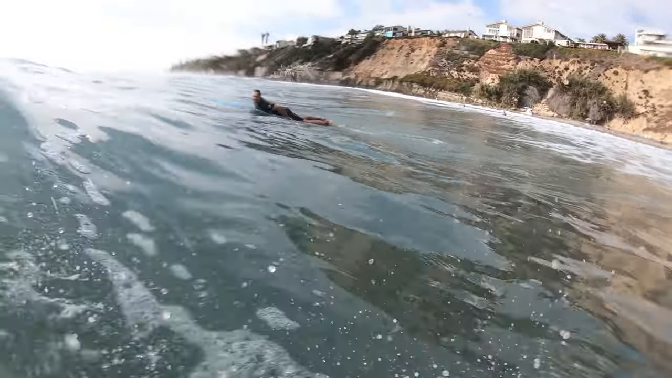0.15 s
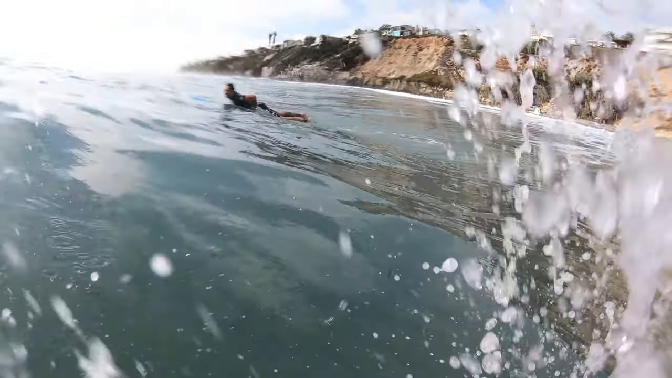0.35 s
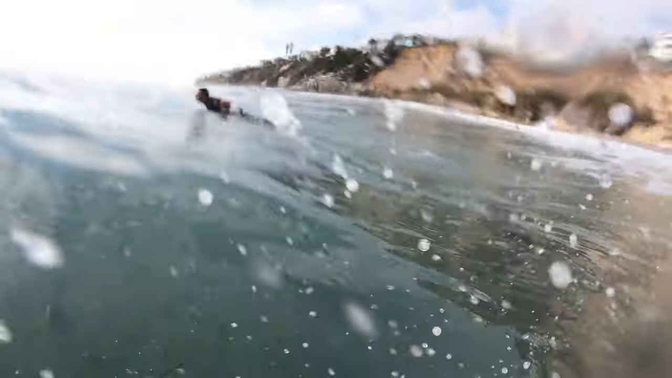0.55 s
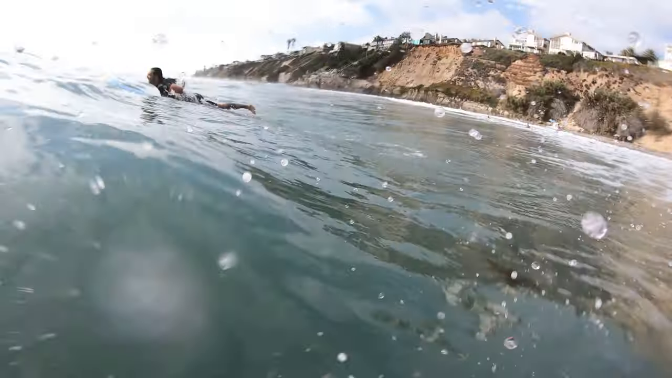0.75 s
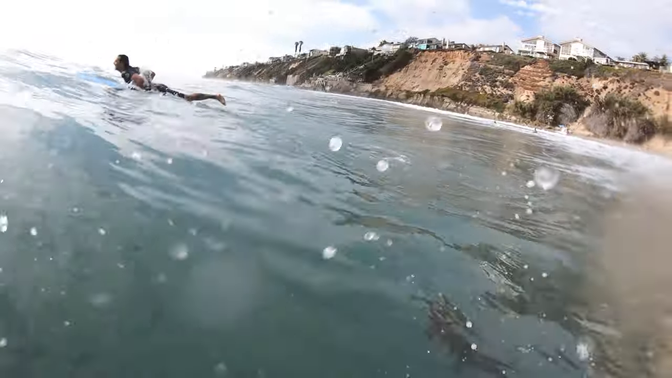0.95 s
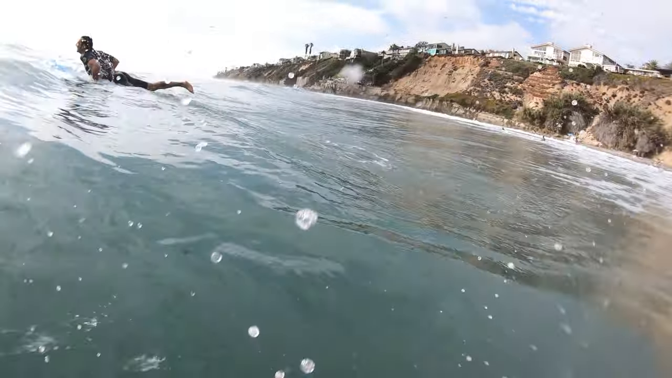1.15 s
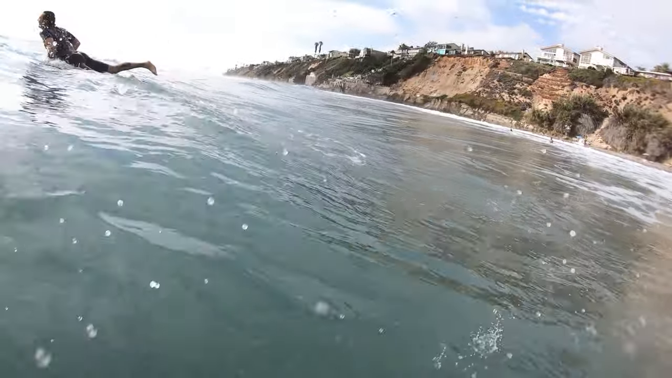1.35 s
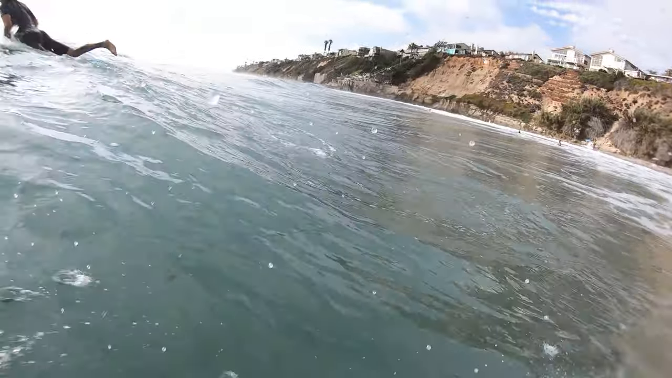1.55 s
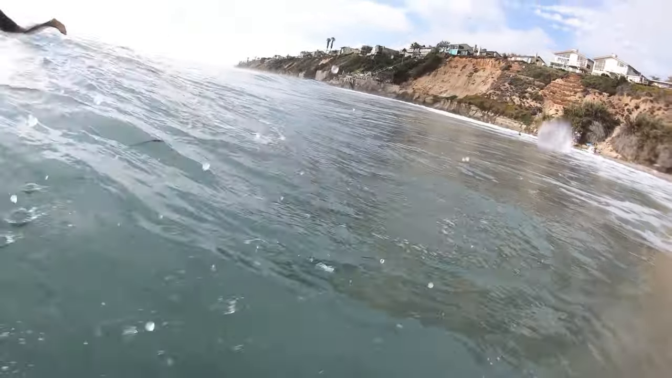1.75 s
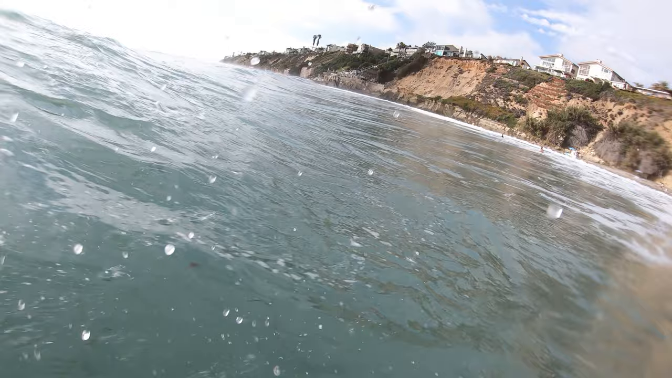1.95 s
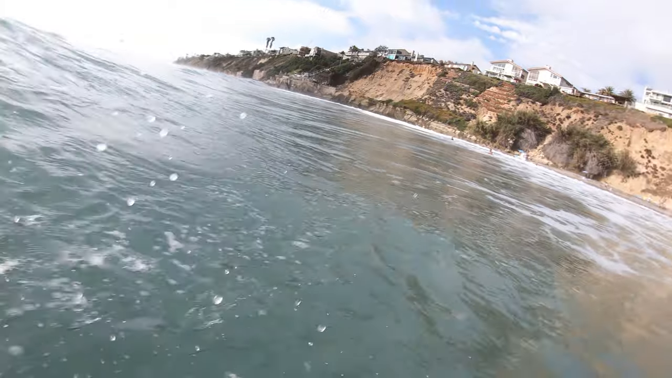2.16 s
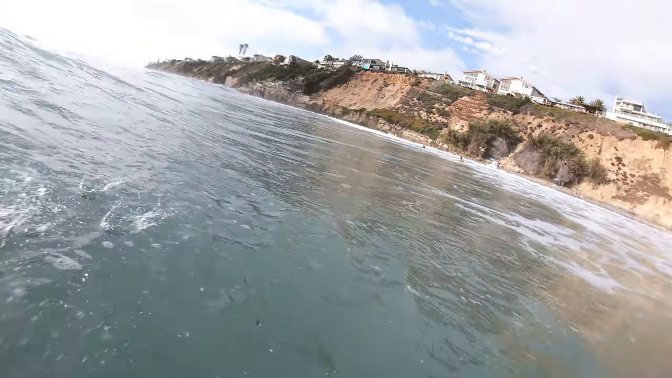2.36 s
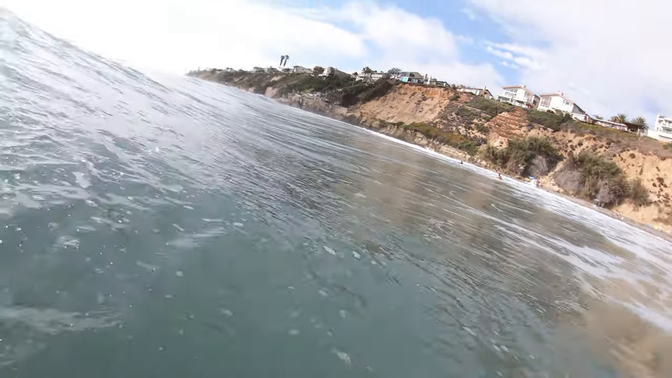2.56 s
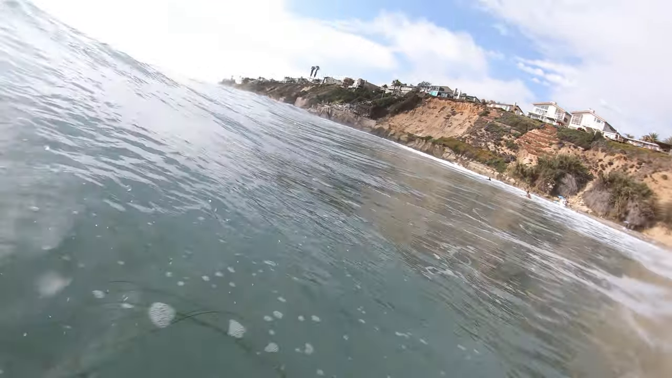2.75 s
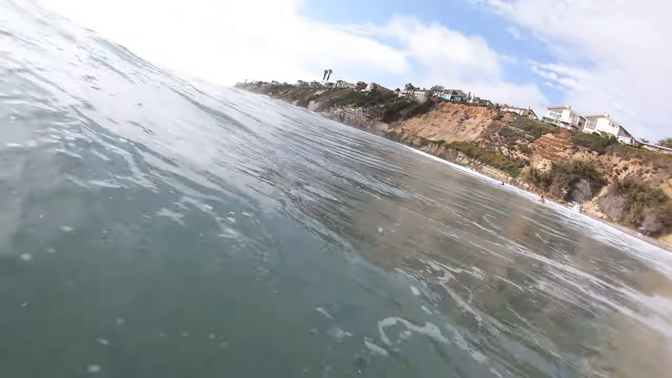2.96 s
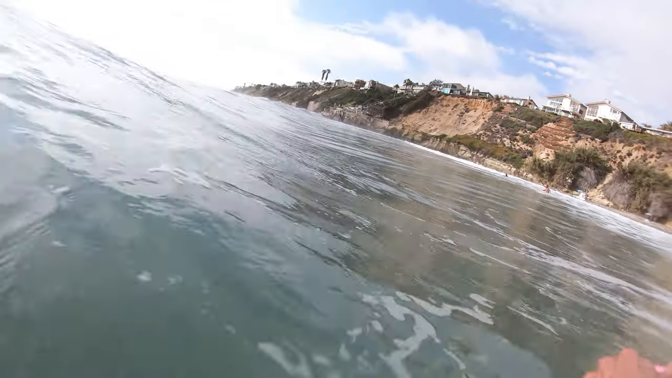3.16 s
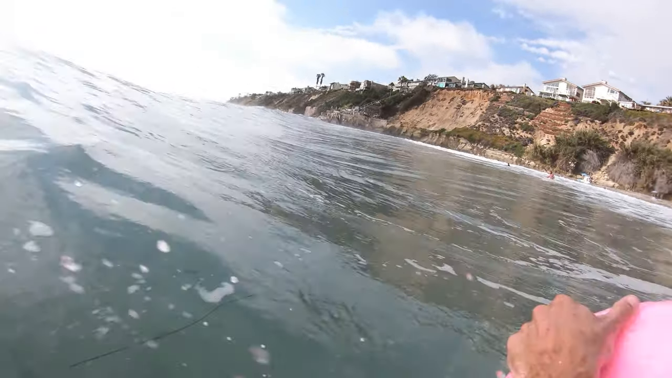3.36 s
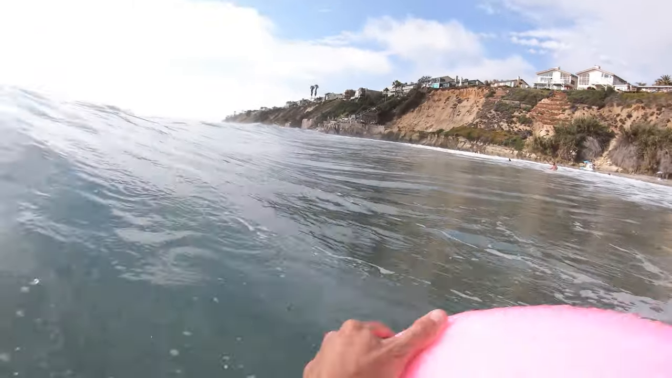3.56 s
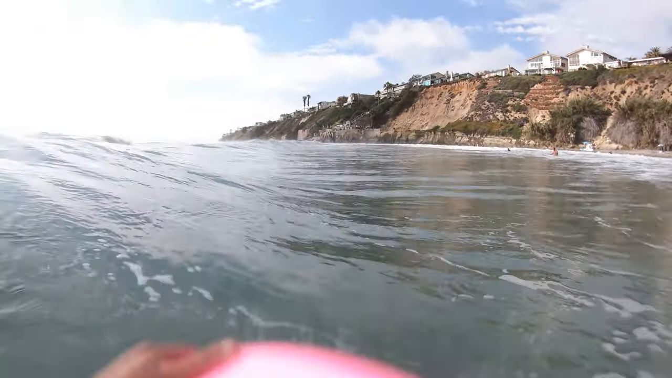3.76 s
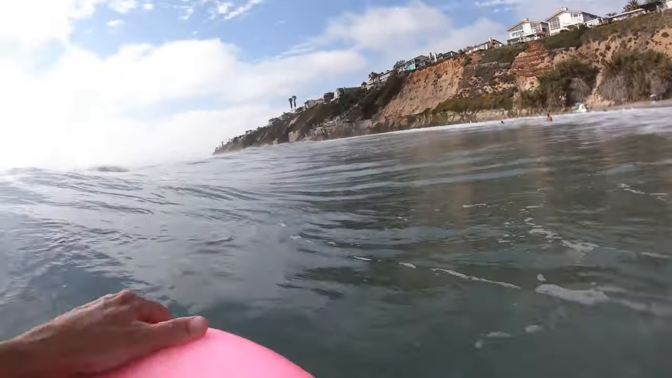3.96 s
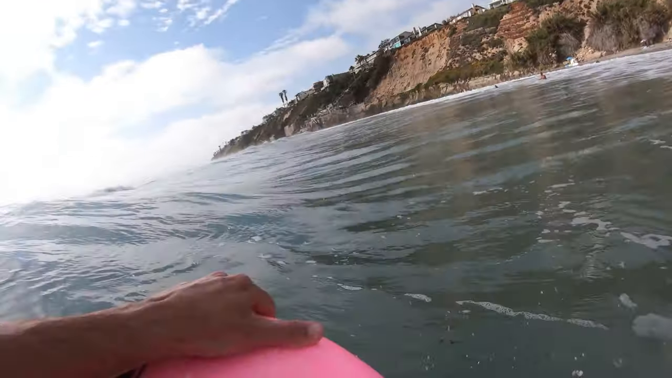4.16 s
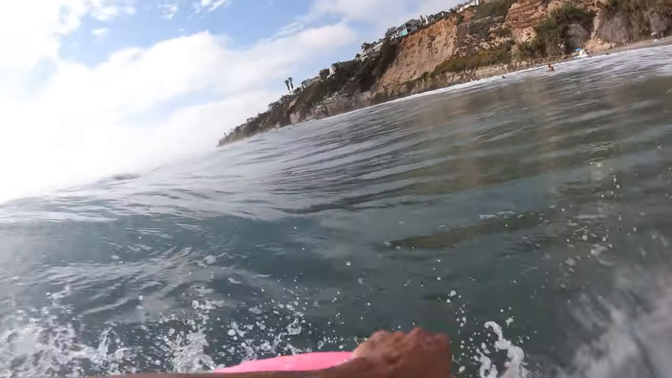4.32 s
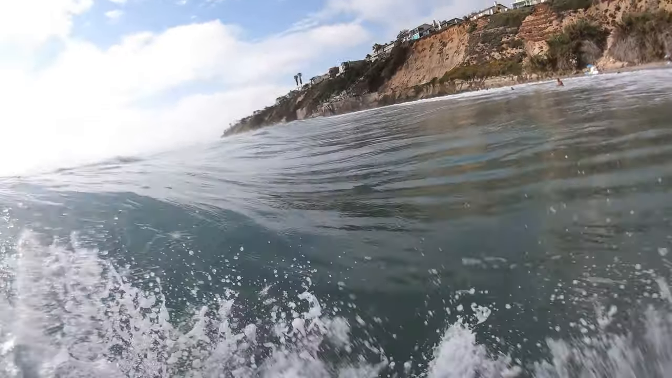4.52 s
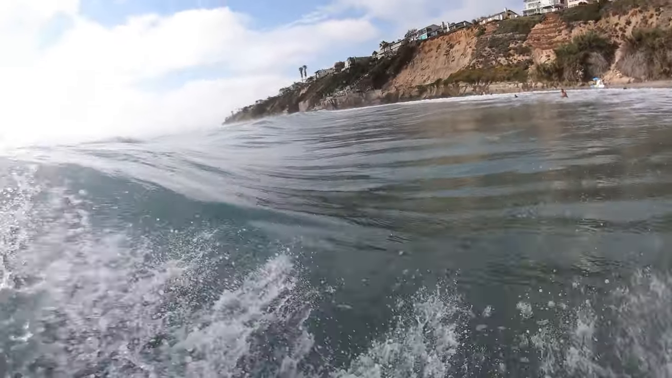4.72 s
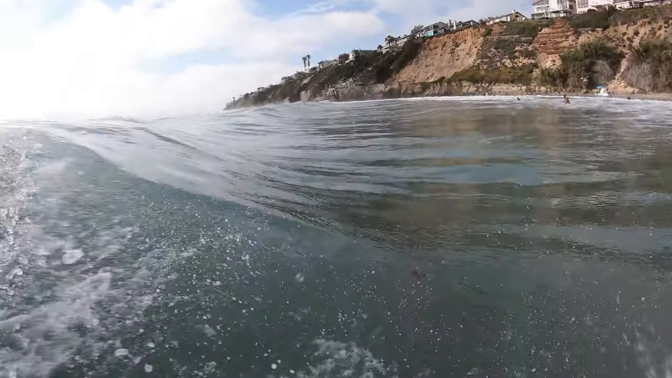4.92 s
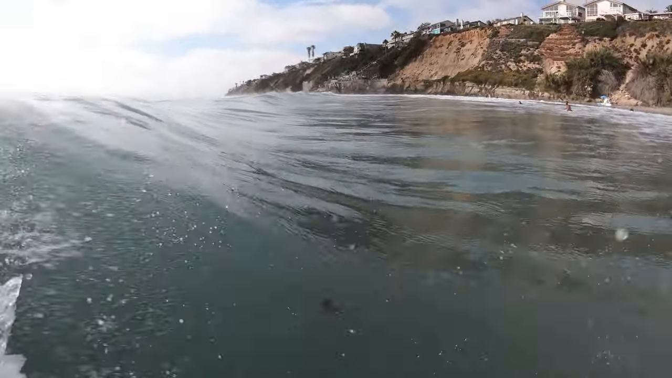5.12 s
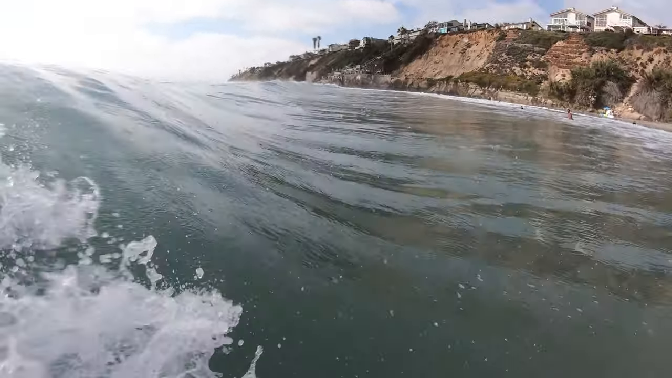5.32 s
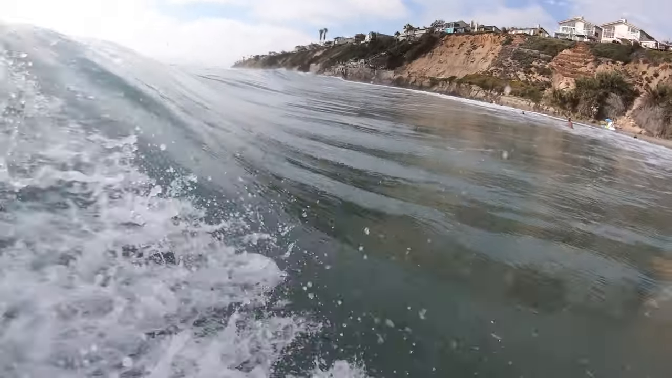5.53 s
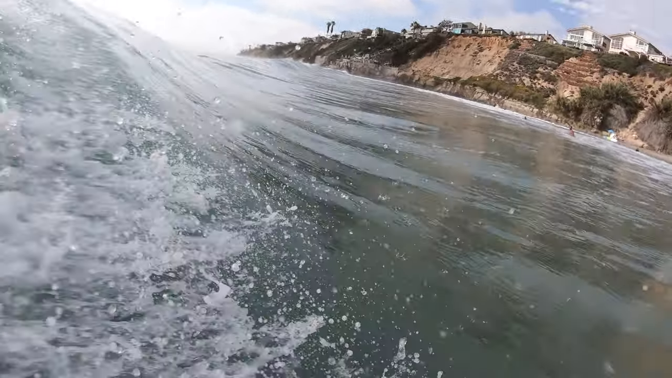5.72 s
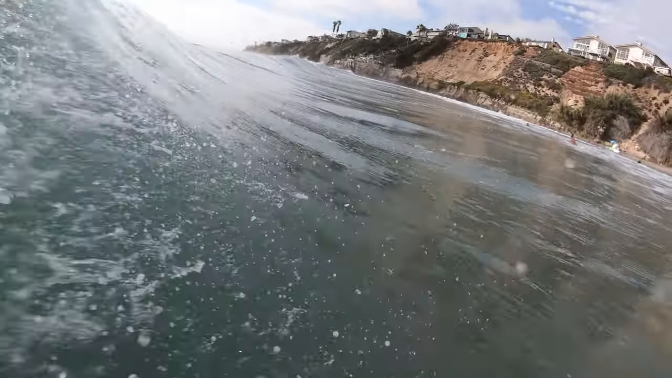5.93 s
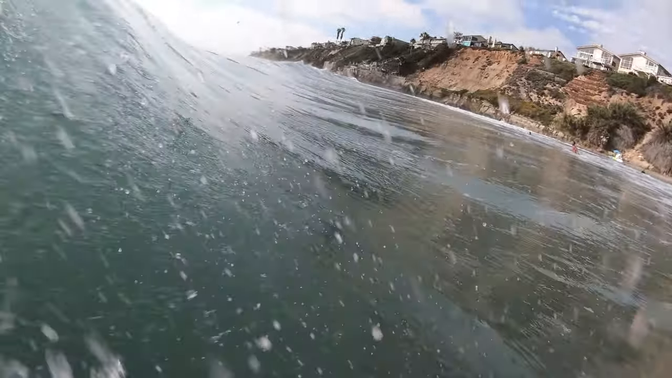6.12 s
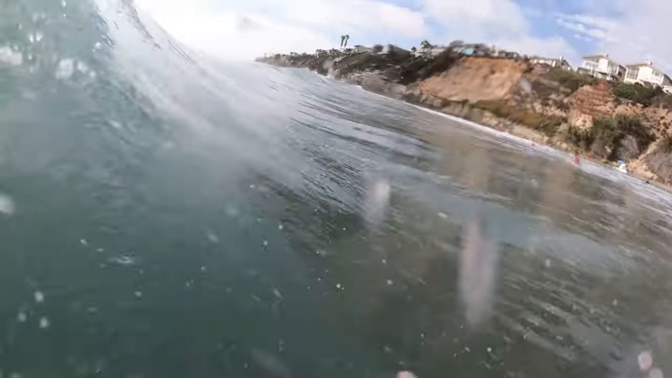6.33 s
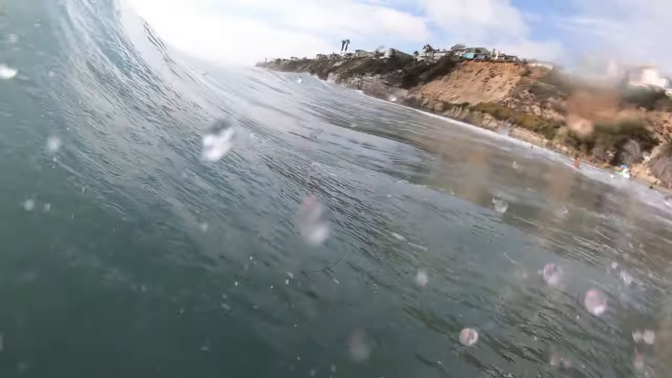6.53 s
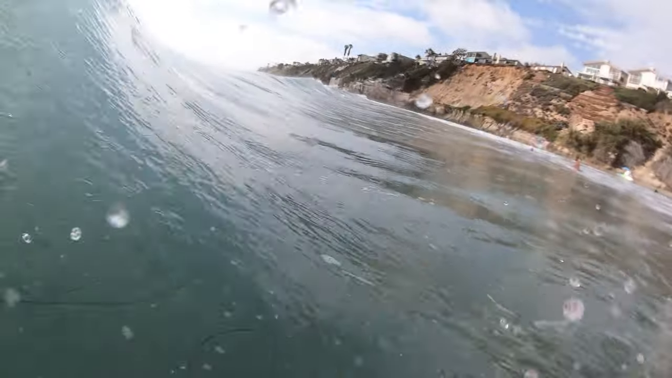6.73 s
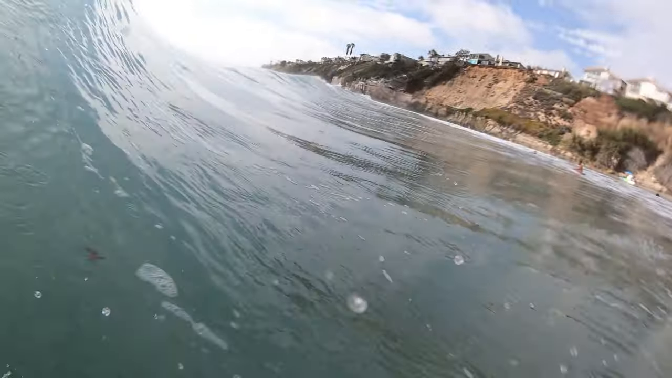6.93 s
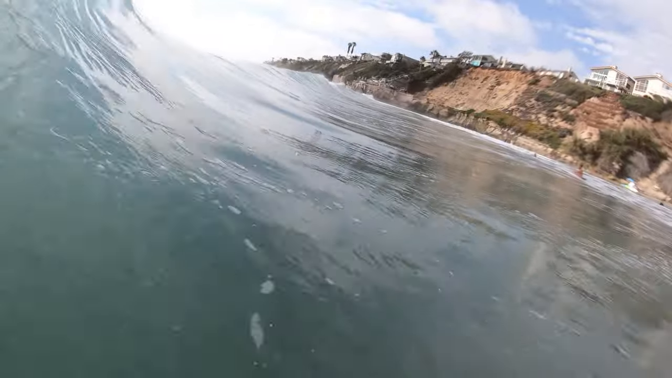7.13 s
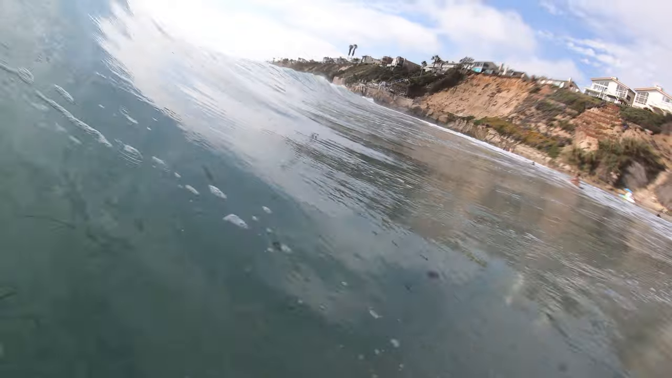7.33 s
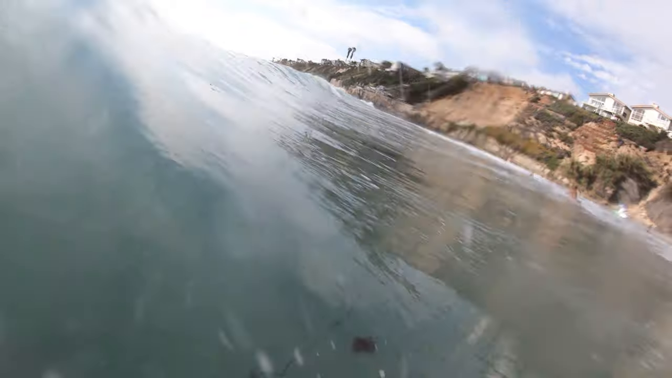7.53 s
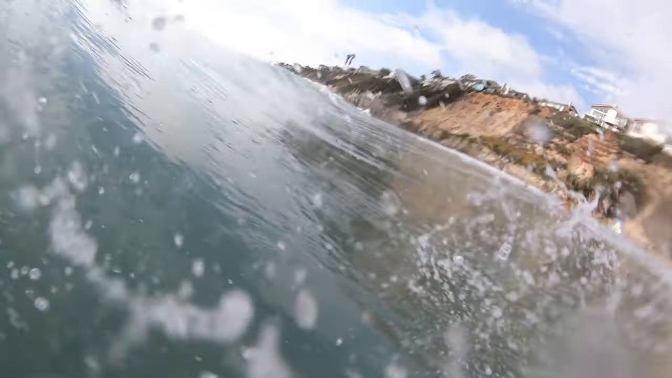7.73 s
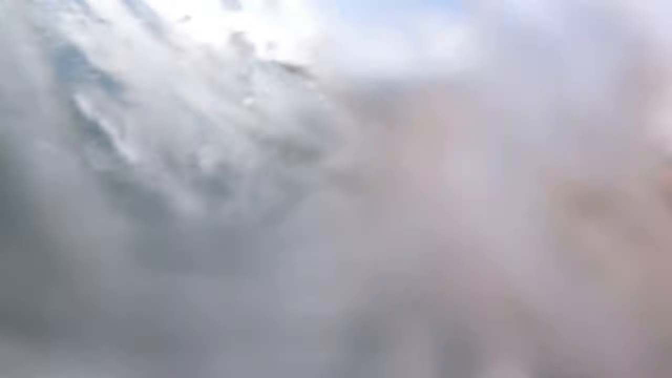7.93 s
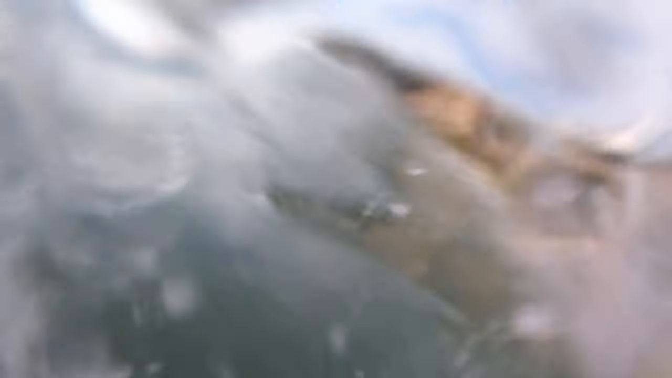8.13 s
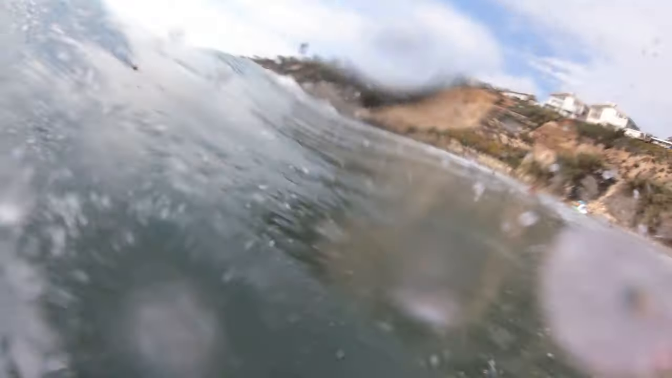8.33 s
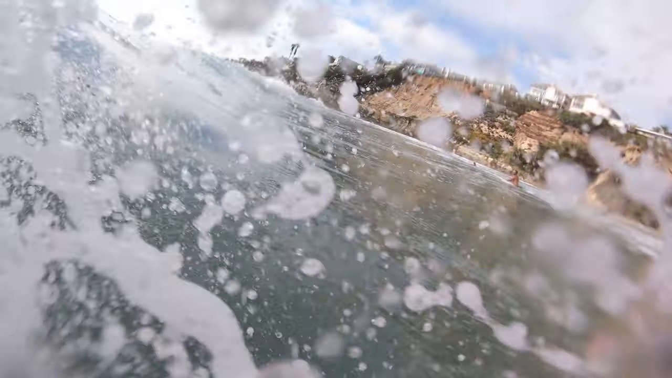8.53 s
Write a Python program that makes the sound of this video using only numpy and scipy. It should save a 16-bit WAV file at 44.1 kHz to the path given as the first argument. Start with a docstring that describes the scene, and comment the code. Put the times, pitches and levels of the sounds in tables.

```python
"""A small waterproof camera rides along a breaking wave, just above the water.
From the start wind buffets its wet microphone port and water rushes past the board, in bubbles and air pockets.
Half a second in, drops tick on the housing and a film drains off it as a band of fizz with a sinking edge.
From 3 s foam froths up, ripples plop and water slaps the port; after 6 s a big shower patters and runs off.
At 8 s the whitewater crashes over with a falling gurgle, thuds and smacks, and seals the port."""
import sys
import numpy as np
from scipy import signal
from scipy.fft import rfft, irfft, next_fast_len
from scipy.io import wavfile
from scipy.ndimage import uniform_filter1d

SR = 44100
rng = np.random.default_rng(int(sys.argv[2]) if len(sys.argv) > 2 else 0)


def materialize(psi):
    """Save the field psi as 16-bit PCM at rate SR to the path in sys.argv[1].

    A 1-D psi becomes a single channel; in a 2-D psi each row is a channel.
    """
    bounded = np.clip(np.atleast_2d(psi).T, -1, 1)
    quanta = np.round(bounded * 32767).astype(np.int16)
    wavfile.write(sys.argv[1], SR, quanta)


N = 382768
TIME = np.arange(N) / SR


def from_db(db):
    """Decibels to gain."""
    return 10 ** (np.asarray(db) / 20)


def rms_one(x):
    """Scale to unit rms."""
    return x / np.sqrt(np.mean(x ** 2) + 1e-20)


def in_time(rows):
    """Draw each column of a table as a curve, sample by sample."""
    s, *columns = np.transpose(rows)
    return [np.interp(TIME, s, column) for column in columns]


def add(out, s, sound):
    """Mix a short sound in at a time."""
    i = int(s * SR)
    out[i:i + len(sound)] += sound[:N - i]


def low_pass(x, hz, order=2):
    """Butterworth low-pass."""
    return signal.sosfilt(signal.butter(order, hz, fs=SR, output="sos"), x)


def band_pass(x, hz, spread, order=2):
    """Butterworth band-pass from hz / (1 + spread) to hz * (1 + spread)."""
    edges = [hz / (1 + spread), hz * (1 + spread)]
    return signal.sosfilt(signal.butter(order, edges, "band", fs=SR, output="sos"), x)


def drift(rate):
    """Slow random wander of unit rms; its movement thins out above rate [Hz]."""
    step = 40   # samples between the points that are drawn
    settle = 2000   # points dropped while the filter settles
    r = np.exp(-2 * np.pi * rate * step / SR)
    chance = rng.standard_normal(N // step + 2 + settle)
    slow = signal.lfilter([1], [1, -2 * r, r * r], chance)[settle:]
    return np.interp(np.arange(N) / step, np.arange(len(slow)), rms_one(slow))


def coloured(x, colour):
    """Filter an excitation with a spectral curve, silent outside its ends; rms 1."""
    size = next_fast_len(N + SR // 10)
    log_hz = np.log(np.maximum(np.arange(size // 2 + 1) * SR / size, 1))
    hz, db = np.transpose(colour)
    gain = from_db(np.interp(log_hz, np.log(hz), db, left=-np.inf, right=-np.inf))
    return rms_one(irfft(rfft(x, size) * gain, size)[:N])


def eddies(lumpy_db, rate):
    """Turbulent pressure: noise that swells and sinks with each passing eddy."""
    return rng.standard_normal(N) * from_db(lumpy_db * drift(rate))


def grains(per_s, size_db):
    """Random impacts, many small and a few large."""
    sizes = from_db(size_db * np.minimum(rng.exponential(1, N), 4))
    signs = rng.choice([-1, 1], N)
    return sizes * signs * (rng.random(N) < per_s / SR)


def bubbles(per_s, size_db, cycles, low_hz, high_hz, count=20):
    """Bubbles of many sizes, each a resonance that falls 60 dB in some cycles."""
    born = grains(per_s, size_db)
    dealt = rng.integers(0, count, N)   # which size each bubble has
    out = 0
    for k, hz in enumerate(np.geomspace(low_hz, high_hz, count)):
        r = np.exp(-np.log(1000) * hz / (cycles * SR))
        w = 2 * np.pi * hz / SR
        births = born * (dealt == k) + 1e-18
        ringing = signal.lfilter([1, 0, -1], [1, -2 * r * np.cos(w), r * r], births)
        out = out + np.sqrt(hz) * ringing
    return rms_one(out)


def plop(hz, cycles):
    """A sine whose envelope swells for some cycles to height 1 and dies away."""
    phase = TIME[:SR // 20] * hz
    age = phase / cycles
    return (age * np.exp(1 - age)) ** 2 * np.sin(2 * np.pi * phase)


# changing air stream on the port: (time [s], rumble [dB], buffet [dB])
AIR_STREAM = [(0, -32, -26.5), (.85, -27, -22.5), (1.1, -29, -28.5), (1.62, -26, -25.5),
              (1.8, -30.5, -30.5), (2.35, -32.5, -29.5), (2.47, -25, -23), (3.05, -35, -26),
              (3.7, -34, -28.5), (4.35, -35, -23), (4.7, -41, -28.5), (4.98, -29.5, -26), (5.3, -35, -28.5),
              (5.7, -33.5, -32), (5.92, -31.5, -27), (6.3, -36, -26.5), (6.9, -28, -24.5),
              (7.55, -32.5, -27.5), (7.8, -26, -25.5), (8.0, -31.5, -33.5), (8.68, -35.5, -28.5)]
# gusts and surges of whitewater on the port: (middle [s], half-length [s], rumble [dB], buffet [dB])
GUST_SWELLS = [(0.703, 0.097, -26.5, -35), (4.265, 0.041, -32, -23), (5.045, 0.062, -26, -19.5),
               (6.422, 0.055, -23.5, -21), (6.631, 0.05, -50, -19.5), (7.872, 0.028, -25, -14),
               (8.088, 0.058, -22, -20), (8.183, 0.022, -12, -15.5), (8.64, 0.026, -15, -20.5)]
# spectra of the large and the smaller eddies: (frequency [Hz], relative density [dB])
RUMBLE_SPECTRUM = [(10, -12.5), (26, 0), (42, 1.5), (60, -6.5), (90, -18), (250, -50.5)]
BUFFET_SPECTRUM = [(35, -27), (62, 0.5), (90, 0.5), (130, -0.5), (200, -10.5), (300, -15), (600, -46),
                   (1500, -94.5)]


def wind():
    """Large eddies rumble on the port, smaller ones buffet it; gusts swell out of the changing stream."""
    rumble, buffet = from_db(in_time(AIR_STREAM))
    for s, half, rumble_db, buffet_db in GUST_SWELLS:
        swell = np.exp(-((TIME - s) / half) ** 2 / 2)
        rumble = np.hypot(rumble, from_db(rumble_db) * swell)
        buffet = np.hypot(buffet, from_db(buffet_db) * swell)
    large = coloured(eddies(lumpy_db=-0.3, rate=16), RUMBLE_SPECTRUM)
    small = coloured(eddies(lumpy_db=1.2, rate=24), BUFFET_SPECTRUM)
    return rumble * large + buffet * small


# water under the board, before trims: (time [s], rush [dB], wash [dB], hiss of fine spray [dB])
RIDE_LEVELS = [(0, -24.5, -33, -56.6), (.48, -24.5, -31, -56.5), (.9, -28.5, -32, -62),
               (1.15, -32, -39, -68), (1.6, -25, -27.5, -61), (1.85, -27.5, -35, -65.5),
               (2.5, -27.5, -36.5, -63), (3.0, -32.5, -39.5, -64), (3.25, -29, -43, -68.1),
               (3.45, -24.5, -34, -58.5), (4.07, -27, -38, -64.5), (4.24, -21.5, -29.5, -57),
               (4.48, -27, -35.5, -60), (4.9, -28, -36, -57.5), (5.33, -23.5, -37, -59),
               (6.02, -27.5, -37.5, -57.5), (6.3, -27, -26.5, -47.5), (6.62, -24.5, -29.5, -49),
               (6.95, -28.5, -41.5, -55), (7.25, -26.5, -36.5, -41), (7.56, -32.5, -42, -46.5),
               (7.68, -27, -26, -55), (8.05, -31, -27.5, -53.1), (8.11, -24, -29, -56),
               (8.19, -35, -37, -50.5), (8.68, -34, -36.5, -47)]
# spectra of the deep rush and the lighter wash: (frequency [Hz], relative density [dB])
RUSH_SPECTRUM = [(90, -28.5), (180, -17), (270, -2.5), (420, -1), (540, -4.5), (700, -11), (1100, -37),
                 (2500, -75.5)]
WASH_SPECTRUM = [(350, -28.5), (560, -3.5), (650, -1), (790, 0.5), (950, -5.5), (1200, -22.5), (1700, -25),
                 (3000, -64.5), (6000, -99.5)]
# ripples on the face of the wave make the water under the board flutter: rms [dB], rate [Hz]
CHOP_DB, CHOP_HZ = 1.17, 6.5


def water(rush_db, wash_db):
    """The board ploughs the wave: a deep rush of large air pockets and a lighter wash of bubbles."""
    pockets = bubbles(per_s=1500, size_db=1.0, cycles=9.0, low_hz=154.0, high_hz=750)
    rush = coloured(pockets + .6 * eddies(lumpy_db=4.5, rate=16), RUSH_SPECTRUM)
    small = bubbles(per_s=2000, size_db=0.5, cycles=8, low_hz=450, high_hz=1400)
    wash = coloured(small + 0.26 * eddies(lumpy_db=-3.5, rate=30), WASH_SPECTRUM)
    return from_db(rush_db - 1.0) * rush + from_db(wash_db - 1.37) * wash


# deep churning in the wake, before the trim: (time [s], level [dB])
CHURN_LEVEL = [(0, -35.5), (.3, -27), (.42, -24.5), (.9, -23.5), (1.05, -31), (1.65, -28.5), (2.55, -31),
               (3.0, -36), (3.7, -29), (4.3, -26), (4.7, -30), (5.0, -29), (5.4, -29), (5.7, -37),
               (6.4, -31.5), (6.63, -17), (6.8, -25), (7.0, -24.5), (7.55, -35), (8.0, -28), (8.13, -16.5),
               (8.25, -36)]


def churn(hz=205, spread=.3, trim_db=-4):
    """The largest air pockets gulp and drum in the wake as low, ringing bubbles."""
    level_db, = in_time(CHURN_LEVEL)
    pockets = bubbles(per_s=400, size_db=1.0, cycles=11, low_hz=150, high_hz=280, count=8)
    return from_db(level_db + trim_db) * rms_one(band_pass(pockets, hz, spread))


THUD_SAG_RAD = 2.75   # the thud's pitch falls by a factor e over this much of its swing


def thud(hz, swell_s):
    """A pressure swing that swells to height 1 and slows as the plug of water in the port grows."""
    t = TIME[:SR // 5]
    age = t / swell_s
    phase = THUD_SAG_RAD * np.log(1 + 2 * np.pi * hz * t / THUD_SAG_RAD)
    return age * np.exp(1 - age) * np.sin(phase)


# water slapping the port, levels before the low-passes: (time [s], thud level [dB],
# thud starting pitch [Hz], thud swell [s], smack level [dB], smack pitch [Hz])
PORT_SLAPS = [(0.716, -10, 200, 0.009, -35, 500), (3.9755, -13, 700, 0.0032, -11, 430),
              (4.208, -15, 600, 0.0026, -23, 400), (4.263, -10.5, 600, 0.0032, -19, 377),
              (5.663, -20.5, 700, 0.0027, -14, 348), (7.864, -9, 300, 0.0037, -26, 510),
              (7.8922, -9, 500, .002, -11.5, 490), (7.907, 0.5, 380, 0.0026, -24, 400),
              (8.081, -4, 150, 0.0062, -9, 332), (8.112, -1.5, 603, 0.002, -5, 690),
              (8.1238, -7, 232, 0.0065, -13, 780), (8.155, -18, 497, .002, -4, 563),
              (8.161, 1, 200, 0.0041, -13, 750), (8.19, -6, 169, 0.0066, -12.5, 700),
              (8.215, -5.5, 550, 0.0049, -18.5, 750), (8.268, -2.5, 450, 0.0047, -23, 610),
              (8.5712, -3, 150, 0.0056, -3, 680), (8.632, -5, 250, 0.0042, -36, 600),
              (8.65, -20, 170, .005, -34, 650), (8.666, -12, 150, 0.0054, -26, 600)]


def slaps(smack_cycles=0.8, thud_cut_hz=900, smack_cut_hz=1400):
    """Water closes the port with a smack, and the pressure step swings out as a low, falling thud."""
    thuds, smacks = np.zeros(N), np.zeros(N)
    for s, thud_db, thud_hz, swell_s, smack_db, smack_hz in PORT_SLAPS:
        add(thuds, s, from_db(thud_db) * thud(thud_hz, swell_s))
        add(smacks, s, from_db(smack_db) * plop(smack_hz, smack_cycles))
    return low_pass(thuds, thud_cut_hz) + low_pass(smacks, smack_cut_hz, order=5)


# single drops and bubbles bursting on the housing, levels before the low-pass:
# (time [s], level [dB], pitch [Hz], swell [cycles])
HOUSING_DROPS = [(.5375, -34, 2400, .6), (.552, -32, 2400, .8), (0.5616, -10, 2150, 1.4),
                 (0.5668, -8, 2200, 0.89), (0.5664, -26, 3500, 1), (.576, -34, 3300, .6),
                 (.5855, -33, 2710, .8), (.598, -13, 1800, 1.9), (.6045, -25, 2400, 1.9),
                 (.6085, -34, 2600, 1.2), (0.6154, -25, 2500, .7), (.622, -20, 1820, 2.6),
                 (.628, -18, 2310, 1), (0.6332, -28.5, 2850, 1.9), (.656, -34, 2400, 0.99),
                 (0.6975, -26, 2450, 1.1), (.6978, -35, 5200, 1.2), (.701, -27, 2270, 1.2),
                 (1.0698, -38.5, 1970, 1.6), (1.9256, -33, 1501, 2.4), (2.327, -31.5, 1700, 0.92),
                 (2.6527, -25, 1460, 1.6), (2.7963, -24.5, 1300, 2), (2.8385, -50, 2600, .5),
                 (2.878, -38, 1850, 1), (2.913, -50, 2780, .8), (2.961, -42, 1980, 2),
                 (2.976, -22.5, 1580, 0.72), (2.985, -49, 3600, 2.6), (3.43, -39, 2200, .8),
                 (3.6927, -33, 1970, 1.1), (3.8923, -35.5, 1960, 1.1), (4.105, -48, 2800, 1.6),
                 (5.544, -29, 1260, 1.8), (6.0374, -30, 1600, 1.2), (6.2843, -16, 650, 1.5),
                 (6.3073, -17, 1000, 0.72), (6.32, -16, 1200, 1.2), (6.3428, -20, 2500, .6),
                 (6.416, -7.5, 2710, 0.7), (6.4255, -14, 2300, 2.2), (6.433, -8, 2400, 1.6),
                 (6.439, -7, 2450, 1.2), (6.445, -9, 2760, 2), (6.474, -10, 2420, .85),
                 (6.485, -16, 3680, 1.3), (7.741, -20, 2540, 3.2), (7.8635, -23, 2500, 0.72),
                 (7.885, -13, 1900, .8), (7.936, -21, 2600, 0.83), (7.9425, -15, 2500, 0.64),
                 (7.973, -17, 2700, 1.5), (8.023, -14, 2200, 2), (8.0732, 1, 1510, 0.65),
                 (8.0875, -14, 1610, 2.8), (8.125, -25, 2200, 0.4), (8.164, -17, 1300, 1.2),
                 (8.269, -18.5, 1300, 0.69)]


def drops(dull_hz=5000, crack_db=-22, crack_hz=4300, crack_cycles=1.3,
          spatter_db=-22, spatter_hz=2300, spatter_t60=0.02):
    """Each large drop is a damped tick and a spatter of fragments; the harder it hits, the more it cracks."""
    ticks, cracks, scatter = np.zeros(N), np.zeros(N), np.zeros(N)
    decay = np.exp(-np.log(1000) * TIME[:SR // 10] / spatter_t60)
    for s, db, hz, cycles in HOUSING_DROPS:
        add(ticks, s, from_db(db) * plop(hz, cycles))
        # the crack gains 2 dB for each dB of the drop
        add(cracks, s + cycles / hz, from_db(2.0 * db + crack_db) * plop(crack_hz, crack_cycles))
        add(scatter, s, from_db(db + spatter_db) * decay)
    fragments = band_pass(grains(per_s=2500, size_db=2.5), spatter_hz, 0.23, order=3)
    ticks = ticks + scatter * rms_one(fragments)
    return low_pass(ticks, dull_hz, order=6) + cracks


# sheets of water hitting the housing and the board: (middle [s], rms [dB], pitch [Hz], half-length [s])
WATER_SHEETS = [(0.053, -25, 514, 0.0038), (0.156, -24, 450, .004), (.221, -22, 566, 0.0035),
                (0.381, -20.5, 577, 0.004), (0.469, -24, 700, 0.003), (0.518, -19, 750, 0.0026),
                (0.537, -22, 790, 0.0033), (0.551, -20.5, 1450, 0.0097), (3.375, -24.5, 687, 0.0026),
                (3.456, -17, 386, 0.0058), (3.517, -22.5, 420, 0.0024), (3.649, -20.5, 416, 0.0056),
                (3.93, -18, 450, 0.0032), (4.204, -27, 590, 0.0051), (4.335, -19.5, 450, 0.0031),
                (4.566, -24.5, 129, 0.062), (4.773, -21, 101.5, 0.058), (5.028, -26, 97, 0.068),
                (6.254, -21.5, 720, 0.0053), (6.313, -26, 1690, 0.0026), (6.332, -15, 1600, 0.003),
                (6.354, -21.5, 1740, 0.0093), (6.402, -28, 2380, 0.0069), (6.435, -27, 2340, 0.022),
                (6.471, -19.5, 2480, .003), (6.502, -28, 2110, 0.0026), (7.65, -27, 2200, .002),
                (7.682, -23, 2110, 0.00203), (7.707, -28, 2280, 0.0085), (7.776, -31, 2200, 0.0044),
                (7.805, -26.5, 1860, 0.016), (7.861, -26, 2370, .004), (7.894, -22.5, 378, 0.0094),
                (7.94, -24, 2410, 0.0045), (7.984, -19, 720, 0.0029), (8.018, -17.5, 1340, 0.0031),
                (8.027, -28.5, 2330, .006), (8.0767, -14, 1400, 0.001), (8.135, -23.5, 370, 0.028),
                (8.159, -26.5, 1250, 0.011), (8.185, -21.5, 840, 0.012), (8.213, -22, 1260, 0.0012),
                (8.64, -37, 750, 0.0025), (8.647, -33, 694, 0.0036)]


def splashes(spread=0.2):
    """A sheet of water bursts in a brief, clumpy swell of impacts around one pitch."""
    out = np.zeros(N)
    for s, db, hz, half in WATER_SHEETS:
        middle = min(s, .2)   # seconds into the burst
        t = TIME[:int(2 * middle * SR)]
        swell = np.exp(-((t - middle) / half) ** 2 / 2)
        impacts = rng.standard_normal(len(t)) * (rng.random(len(t)) < hz / SR)   # about one a cycle
        burst = band_pass(impacts, hz, spread, order=3) * swell
        add(out, s - middle, from_db(db) * rms_one(burst) * np.sqrt(np.mean(swell ** 2)))
    return out


# resonances of the wet housing: (frequency [Hz], width [Hz], level [dB])
HOUSING_MODES = [(1730, 29, -6), (2110, 12, -1.5), (2310, 22, -3), (2450, 13, -2.5), (2640, 19, -5.5),
                 (2880, 15, -2.5), (3050, 17, -2), (3100, 13, -1.5), (3500, 24, 0.5), (3660, 20, -0.5),
                 (3840, 45, -0.5), (4120, 18, 1), (4250, 14, 0)]


def housing(x):
    """Narrow resonances of the case stand out of whatever patters on it."""
    out = x
    for hz, width_hz, db in HOUSING_MODES:
        b, a = signal.iirpeak(hz, hz / width_hz, fs=SR)
        out = out + from_db(db) * signal.lfilter(b, a, x)
    return out


SHOWER_RISE_DB_PER_S, SHOWER_FALL_DB_PER_S = 451.5, 357


def shower(start, length, fall_db_per_s):
    """Envelope of falling water: it sets in, holds and dies away, in straight lines of dB."""
    early = np.maximum(start - TIME, 0)
    late = np.maximum(TIME - start - length, 0)
    return from_db(-SHOWER_RISE_DB_PER_S * early - fall_db_per_s * late)


# showers of spray, before trims: (start [s], length [s], patter [dB], fine mist [dB])
SPRAY_SHOWERS = [(0.547, 0.079, -42.5, -62), (0.695, .002, -53, -60), (6.336, .012, -31, -62),
                 (6.392, 0.021, -29, -66.5), (6.422, 0.046, -32, -34), (7.627, 0.04, -34, -68),
                 (7.691, 0.35, -31.5, -80), (7.862, 0.0088, -33, -47), (7.93, 0.011, -34, -44.5),
                 (7.97, 0.11, -32.5, -54), (8.186, 0.016, -34.5, -45), (8.23, 0.37, -42.5, -69)]
# spectra of the patter and the mist: (frequency [Hz], relative density [dB])
PATTER_SPECTRUM = [(500, -15.5), (1000, -3.5), (1400, -3), (1800, -2.1), (2200, -1.2), (2500, -8.5),
                   (2850, -11), (3250, -14.5), (4000, -21.5), (5000, -27), (8000, -77.5)]
MIST_SPECTRUM = [(2200, -28), (3200, -11), (4000, -5), (4600, -14.5), (5400, -12.5), (6000, -19.5),
                 (6700, -23), (7200, -25.5), (8600, -48.5)]
# after the big shower the water runs off the housing, ever more thinly (levels before trims)
RUNOFF_S, RUNOFF_DB, RUNOFF_MIST_DB, RUNOFF_FALL_DB_PER_S = 6.48, -31.5, -50, 10.5


def spray(hiss_db):
    """Thousands of droplets patter and gurgle on the housing; the finest merge into an even hiss."""
    gurgle = bubbles(per_s=1300, size_db=2.5, cycles=27, low_hz=900, high_hz=3380)
    droplets = rms_one(grains(per_s=3600, size_db=2.0))
    patter = housing(droplets + .4 * gurgle + .5 * rng.standard_normal(N))
    fine_droplets = rms_one(grains(per_s=2800, size_db=16.0))
    mist = housing(fine_droplets + 0.75 * rng.standard_normal(N))

    runoff = shower(RUNOFF_S, 0, RUNOFF_FALL_DB_PER_S)
    coarse = np.hypot(from_db(hiss_db), from_db(RUNOFF_DB) * runoff)
    fine = from_db(RUNOFF_MIST_DB) * runoff
    for start, length, patter_db, mist_db in SPRAY_SHOWERS:
        falling = shower(start, length, SHOWER_FALL_DB_PER_S)
        coarse = np.hypot(coarse, from_db(patter_db) * falling)
        fine = np.hypot(fine, from_db(mist_db) * falling)

    # thick spray arrives in clumps, thin spray evenly
    thick = np.clip((20 * np.log10(coarse) + 36) / 8, 0, 1)
    clumps = from_db(2.3 * thick * (drift(47) + 1.05))
    pattering = coarse * from_db(2.0) * coloured(patter, PATTER_SPECTRUM)
    misting = fine * from_db(-4.5) * coloured(mist, MIST_SPECTRUM)
    return clumps * (pattering + misting)


# water film draining off the port: (time [s], level [dB], upper edge [Hz])
DRAINING_FILM = [(.48, -48, 1686), (.53, -33, 1792), (1.15, -38.5, 1572), (1.6, -35.5, 1560),
                 (1.88, -40.5, 1463), (2.05, -39, 1384), (2.45, -41, 1188), (3.15, -46, 1129),
                 (3.4, -73, 1071)]
# the whitewater swallows the port with a falling gurgle: (time [s], level [dB], upper edge [Hz])
FALLING_GULP = [(7.99, -110, 2897), (8.023, -28, 2700), (8.04, -33, 2340), (8.052, -26, 2127),
                (8.07, -20.5, 2058), (8.08, -30, 1915), (8.089, -25, 1768), (8.101, -36, 1542),
                (8.112, -26, 1380), (8.12, -36, 1130), (8.127, -14, 980), (8.17, -110, 850)]


def film(rows, width_hz, flicker_db):
    """A band of fizz whose sharp upper edge sinks as water slides over the port."""
    level_db, edge_hz = in_time(rows)
    noise = rng.standard_normal(N) + 1j * rng.standard_normal(N)
    fizz = low_pass(noise, width_hz / 2, order=14)
    # a turning phasor shifts the band up to its moving centre
    centre = np.exp(2j * np.pi * np.cumsum(edge_hz - width_hz / 2) / SR)
    return from_db(level_db + flicker_db * drift(27)) * rms_one((fizz * centre).real)


# foam churned up by the board, before the trim: (time [s], level [dB])
FOAM_LEVEL = [(3.2, -53), (3.34, -44.5), (3.8, -43), (4.0, -49), (4.15, -52), (4.22, -41), (4.35, -42.5),
              (4.6, -48.5), (4.95, -50), (5.02, -42.5), (5.6, -47), (6.1, -48), (6.28, -44.5), (6.4, -71)]
# spectrum of the froth: (frequency [Hz], relative density [dB])
FOAM_SPECTRUM = [(700, -24), (1000, 8), (1200, -1.2), (1450, -5), (1750, -9.5), (2200, -22.5), (4000, -50)]


def foam():
    """Small ringing bubbles froth up as the board turns on the face."""
    level_db, = in_time(FOAM_LEVEL)
    froth = bubbles(per_s=2700, size_db=5.0, cycles=7.2, low_hz=900, high_hz=2200)
    return from_db(level_db + 1.5) * coloured(froth, FOAM_SPECTRUM)


# the board chatters over a patch of ripples, before the low-pass: (time [s], level [dB])
RIPPLE_HITS = [(3.738, -33), (3.802, -27), (3.976, -24.5), (3.993, -41), (4.0115, -35), (4.03, -35),
               (4.048, -32), (4.072, -31), (4.089, -31), (4.113, -28.5), (4.193, -33), (4.24, -33),
               (4.372, -35), (4.438, -33), (4.48, -34)]


def ripples(hz=1200, cycles=1.4, pitch_spread=.07, dull_hz=1700):
    """Each ripple meets the board with a small, soft plop, its pitch scattered around hz."""
    out = np.zeros(N)
    for (s, db), chance in zip(RIPPLE_HITS, rng.standard_normal(len(RIPPLE_HITS))):
        add(out, s, from_db(db) * plop(hz * np.exp(pitch_spread * chance), cycles))
    return low_pass(out, dull_hz, order=6)


# bands of fizz, some wide, some narrow as a ring, before the flutter and fade:
# (start [s], end [s], pitch [Hz], half-width [share of pitch], rms [dB])
FIZZ_BANDS = [(0.519, 0.583, 2650, 0.093, -47.5), (0.679, 0.897, 1883, 0.013, -46),
              (3.3, 3.832, 1890, 0.23, -55.5), (3.794, 4.14, 1420, 0.07, -53),
              (4.18, 4.36, 1850, 0.16, -56.5), (4.99, 5.192, 1257, 0.11, -37),
              (5.032, 5.375, 1410, 0.21, -54.5), (6.405, 6.46, 2245, 0.042, -24.5),
              (6.597, 6.872, 1340, 0.21, -38), (8.263, 8.305, 3850, 0.036, -56),
              (8.275, 8.357, 5380, 0.027, -67.5)]


def fizz_bands(uneven_db=2.0, uneven_hz=22, fade_share=0.11):
    """Bands of noise that set in quickly, flutter and fade; the narrow ones are heard as a wavering ring."""
    out = np.zeros(N)
    flutter = from_db(uneven_db * drift(uneven_hz))
    t = TIME[:SR] - .02   # a little lead for the smoothed onset
    for start, end, hz, spread, db in FIZZ_BANDS:
        length = end - start
        fading = np.exp(-np.maximum(t - length, 0) / (fade_share * abs(length)))
        heard = uniform_filter1d(fading * (t > 0), size=900)
        fizz = rms_one(band_pass(rng.standard_normal(SR), hz, spread, order=3))
        add(out, start + t[0], from_db(db) * heard * fizz)
    return flutter * out


# a thin ring that pulses and fades around the crash: (time [s], level [dB])
RING_LEVEL = [(8.15, -97), (8.186, -29), (8.214, -32), (8.246, -49), (8.268, -41), (8.304, -37),
              (8.32, -49), (8.335, -34), (8.367, -39), (8.41, -80), (8.448, -54), (8.468, -36), (8.54, -74),
              (8.57, -110)]


def ring(hz=1143, waver_hz=7, waver_db=3.0):
    """A thin sine, slightly wavering in pitch and level."""
    level_db, = in_time(RING_LEVEL)
    phase = 2 * np.pi * np.cumsum(hz + waver_hz * drift(23)) / SR
    return from_db(level_db + waver_db * drift(25)) * rms_one(np.sin(phase))


# a sheet of water seals the port, then thins; a negative loss is a slight lift:
# (time [s], loss of the flow [dB], loss of the spray [dB], time to clear [s])
PORT_SEALS = [(8.074, -1.5, -0.5, 0.078), (8.225, 15, 13.5, 0.21), (8.568, 13, 28.5, 0.16)]
SEAL_CLOSE_S = 0.005
# what a sealed port lets through; share of cover at which the spray is fully dulled
SEAL_CUT_HZ, SEAL_DULL_COVER = 3750, 0.19


def sealed(flow, patter):
    """A seal closes at once and clears steadily; it changes the flow's level, and the spray's level and treble."""
    flow_db, spray_db, covered = np.zeros(N), np.zeros(N), np.zeros(N)
    for s, loss_db, spray_loss_db, clear_s in PORT_SEALS:
        closing = np.clip((TIME - s) / SEAL_CLOSE_S, 0, 1)
        clearing = np.clip(1 - (TIME - s) / clear_s, 0, 1)
        cover = closing * clearing
        flow_db = flow_db - loss_db * cover
        spray_db = spray_db - spray_loss_db * cover
        covered = np.maximum(covered, cover)
    dull = np.clip(covered / SEAL_DULL_COVER, 0, 1)
    # low-passed both ways, to stay in step
    muffled = low_pass(low_pass(patter, SEAL_CUT_HZ)[::-1], SEAL_CUT_HZ)[::-1]
    dulled = dull * muffled + (1 - dull) * patter
    return from_db(flow_db) * flow + from_db(spray_db) * dulled


def scene():
    """Wind and water around the port, muffled when it is sealed, with the blows of the water on top."""
    rush_db, wash_db, hiss_db = in_time(RIDE_LEVELS)
    chop_db = CHOP_DB * drift(CHOP_HZ)
    flow = wind() + water(rush_db + chop_db, wash_db + chop_db) + churn() + foam()
    flow = flow + film(DRAINING_FILM, width_hz=750, flicker_db=1.5)
    flow = flow + film(FALLING_GULP, width_hz=380, flicker_db=0.8)
    blows = slaps() + drops() + splashes() + ripples()
    return (sealed(flow, spray(hiss_db)) + fizz_bands() + ring() + blows)[None]


def record(dry):
    """The port passes no steady pressure, the highest peaks are rounded and the top is cut."""
    moving = signal.sosfilt(signal.butter(1, 12, "high", fs=SR, output="sos"), dry)
    rounded = moving / (1 + moving ** 6) ** (1 / 6)
    # 70 dB down from 8600 Hz
    return signal.sosfilt(signal.cheby2(12, 70, 8600, fs=SR, output="sos"), rounded)


dry = scene()
out = record(dry)
materialize(out)
```